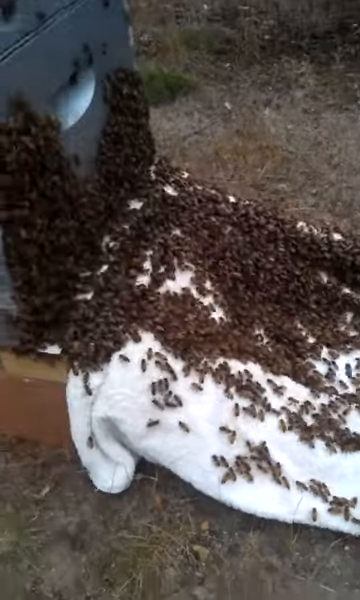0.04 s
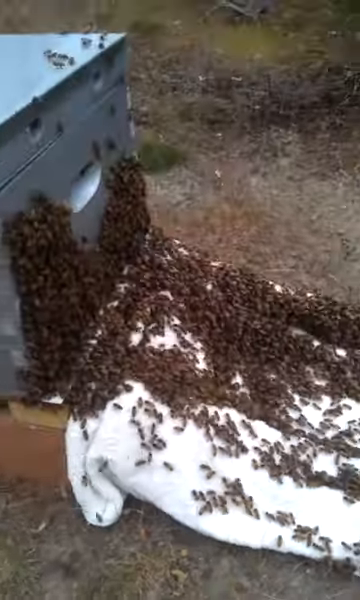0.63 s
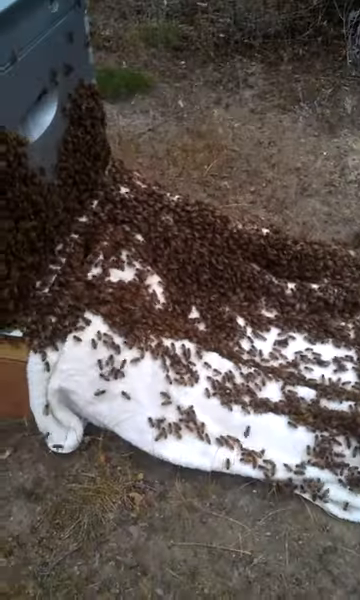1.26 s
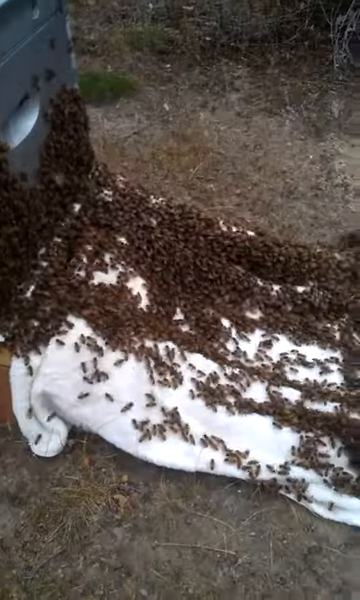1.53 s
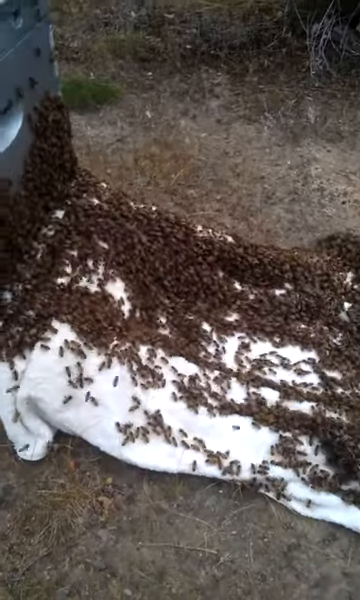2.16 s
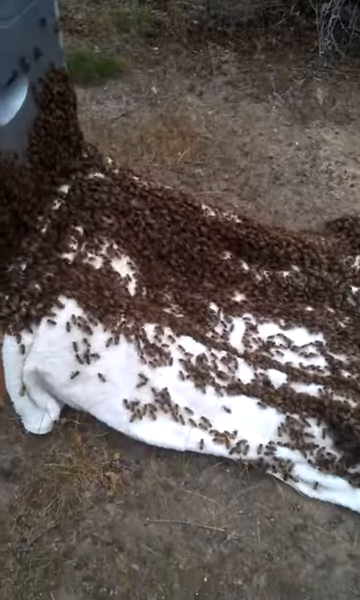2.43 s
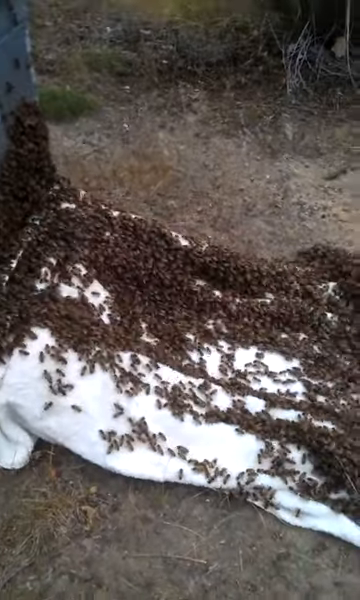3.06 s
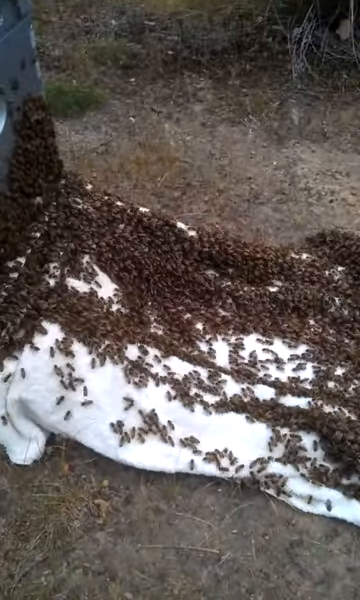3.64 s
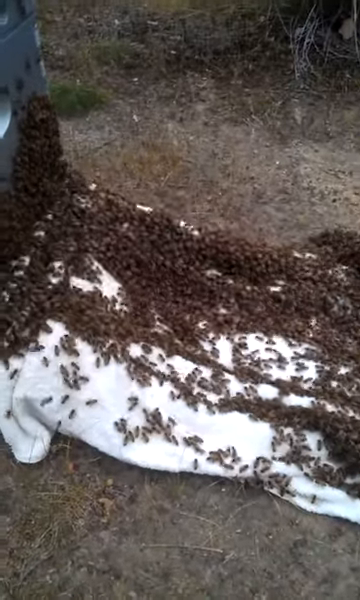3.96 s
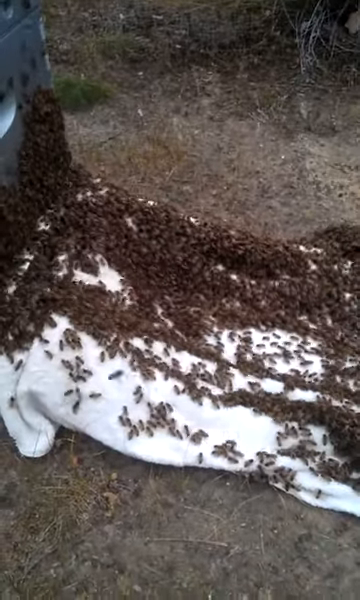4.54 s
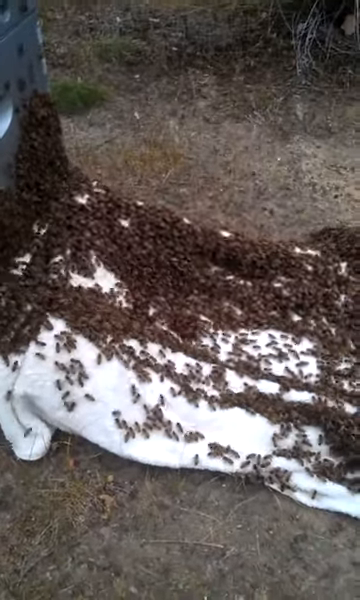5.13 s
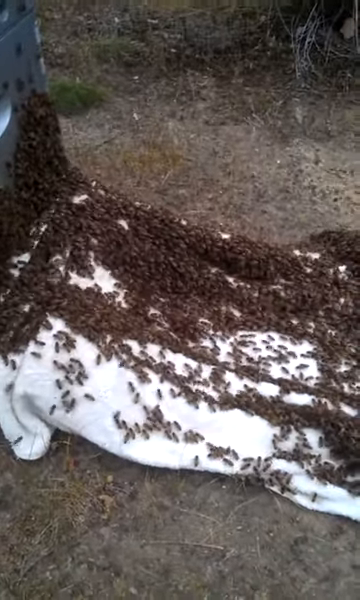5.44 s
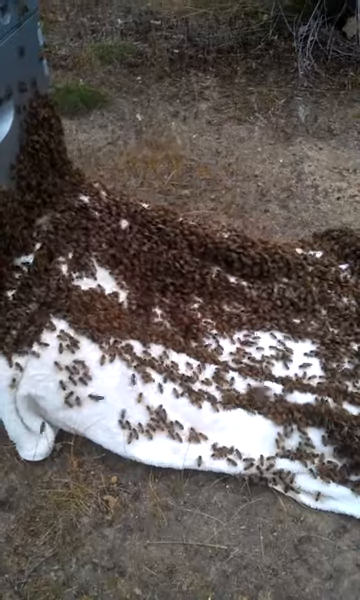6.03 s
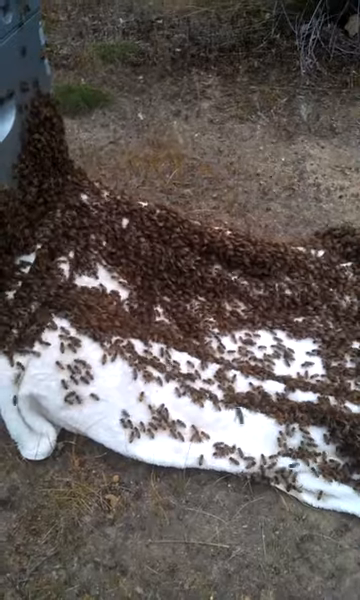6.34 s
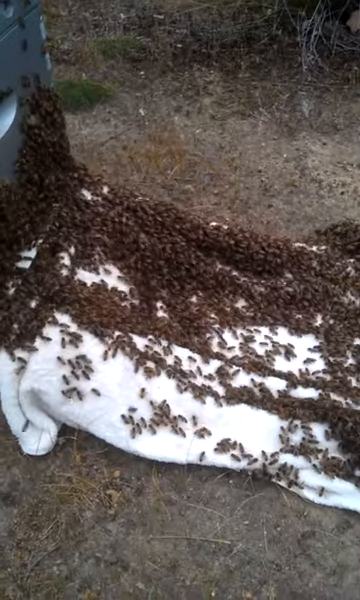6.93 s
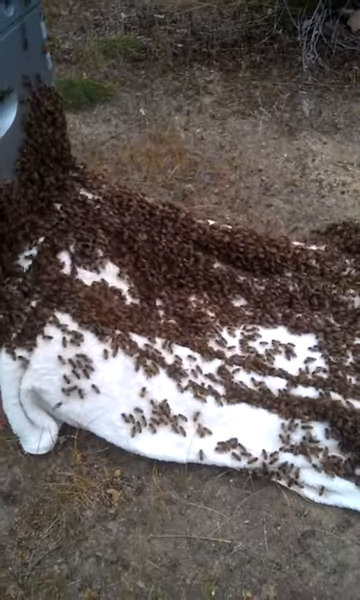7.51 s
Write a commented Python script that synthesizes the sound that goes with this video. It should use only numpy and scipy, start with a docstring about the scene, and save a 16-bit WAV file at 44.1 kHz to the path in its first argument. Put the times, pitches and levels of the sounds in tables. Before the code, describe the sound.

A honeybee swarm hums steadily outdoors, single bees buzzing close, while fingers rub and click on the phone early on.

```python
"""At a hive, outdoors: a honeybee swarm hums over the ground as it moves in; single bees swing close by.
Each bee's wingbeat is a wandering harmonic tone; thousands of feet and wings rustle faintly beneath.
Mostly in the first seconds, fingers slide and rub on a hand-held phone, whose casing clicks and snaps."""
import sys
import numpy as np
from scipy import signal
from scipy.fft import rfft, irfft, next_fast_len
from scipy.io import wavfile

SR = 44100
rng = np.random.default_rng(int(sys.argv[2]) if len(sys.argv) > 2 else 0)


def wav_record(signal):
    """Record a signal, one row per channel, as 16-bit PCM in the file named by sys.argv[1]."""
    frames = np.transpose(np.atleast_2d(signal))
    bounded = np.clip(frames, -1, 1)
    # unit amplitude maps onto the largest positive 16-bit level
    quanta = np.round(bounded * 32767).astype(np.int16)
    wavfile.write(sys.argv[1], SR, quanta)


N = 342657
T = np.arange(N) / SR

# crawling bees and open air: (frequency [Hz], gain [dB])
RUSTLE_SPECTRUM = [(30, -28), (90, -14), (130, -15), (180, 9.5), (370, 14.5), (700, 11.5), (1400, 5.5),
                   (2100, 2.5), (3200, 2), (5000, 1.5), (8500, 0), (10300, -5.5), (16000, -12)]
# light finger slides: (peak time [s], attack [s], release [s], level [dB])
FINGER_SLIDES = [(0.08, .15, 0.46, -48.5), (0.39, 0.033, 0.14, -47), (0.56, .08, 0.25, -45),
                 (0.91, 0.037, 0.12, -43.5), (1.1, .1, .1, -42.5), (1.215, 0.066, 0.22, -45),
                 (1.58, 0.13, 0.048, -43.5), (1.79, 0.021, 0.17, -49), (1.88, 0.017, 0.064, -40),
                 (2.04, 0.039, 0.027, -49), (2.13, 0.055, 0.1, -49.5), (2.93, 0.049, 0.15, -43.5),
                 (3.4, .12, 0.36, -57), (3.66, 0.16, .15, -55.5)]
# hard rubs: (peak time [s], attack [s], release [s], level [dB], relative scrape [dB], resonance [Hz])
FINGER_RUBS = [(0.662, 0.0047, 0.0064, -35.5, 1, 5700), (0.677, 0.015, 0.017, -36, -2.5, 9000),
               (1.078, 0.012, 0.023, -38, -1, 5500), (1.105, 0.014, 0.019, -37, -10, 8000),
               (1.695, 0.016, 0.029, -31.5, -8.5, 8000), (1.906, 0.0073, 0.014, -31, -1, 4530),
               (1.929, 0.016, 0.013, -33.5, 6.5, 1150), (2.565, 0.004, 0.041, -41, 6.5, 5000),
               (2.626, 0.046, 0.02, -24.5, -4, 3100), (2.668, 0.026, 0.069, -36, -23, 5950),
               (2.737, 0.025, 0.018, -38, 2.5, 8500), (2.774, 0.021, 0.015, -25, -14, 4200),
               (2.789, 0.0083, 0.0068, -35, 9, 8500), (2.866, 0.022, 0.012, -30, -4.5, 8500),
               (2.882, 0.0063, 0.013, -37.5, 12, 2000), (3.323, 0.0044, 0.014, -47, 10.5, 2600),
               (3.384, 0.008, 0.014, -55.5, 15, 2600)]
# skin sliding on the casing: (frequency [Hz], gain [dB])
SLIDE_SPECTRUM = [(300, -42), (2200, -15.5), (3700, -2.5), (5500, -1), (7000, -2), (8800, 0), (10500, -10),
                  (12500, -13.5), (16000, -20)]
# rub hiss, also click crack: (frequency [Hz], gain [dB])
RUB_SPECTRUM = [(200, -38), (1200, -4.5), (2600, -1), (4000, 0.5), (7000, 2.5), (9000, 0.5), (11500, -0.5),
                (12400, -8), (16000, -18)]
# skin catching under pressure: (frequency [Hz], gain [dB])
SCRAPE_SPECTRUM = [(40, -50), (110, -29), (220, -6.5), (500, -3), (800, -3), (1150, 0.5), (1600, 0),
                   (2300, -9.5), (5000, -14.5), (16000, -60)]
# dull clicks and knocks: (time [s], level [dB], ring [Hz], half length [ms], relative crack [dB])
GRIP_CLICKS = [(0.556, -43, 6030, 1.1, 8), (0.662, -26, 1400, 0.61, -16), (0.6647, -16, 1050, 0.32, -22),
               (1.681, -31, 915, 0.51, -12), (2.224, -28, 800, 0.89, -10), (2.2542, -5, 2930, 0.15, -23),
               (2.255, -22, 1840, 0.84, -21), (2.368, -43, 3630, 2.2, 4), (2.535, -29, 900, 1.4, -25),
               (2.565, -27.5, 488, 2.3, -23), (2.7857, -15.5, 3920, 0.3, -19), (2.827, -23.5, 800, 0.5, -9),
               (2.8768, -14.5, 2780, 0.27, -8), (2.8835, -17, 427, 0.49, -29), (2.885, -58, 55, 5.8, -22),
               (3.319, -37.5, 2560, 1.2, 0), (7.3412, -27.5, 2750, 0.35, -17)]
# sharp casing slips: (time [s], peak before high-pass [dB], tilt [dB/octave])
CASING_SNAPS = [(0.6513, -23, 3), (0.6533, -23, 5), (0.6584, -14, 2), (0.6608, -12.5, -5),
                (0.6639, -8.5, 9), (1.68, -22, 12), (2.2222, -24, -2), (2.2352, -25, -3), (2.252, -20, 7),
                (2.7858, -12, -7), (2.876, -4, 2), (3.318, -16, 1), (7.341, -23, -8)]
# modes rung by a snap: (frequency [Hz], gain [dB], T60 [ms])
CASING_MODES = [(2700, -35, 1.9), (3800, -4.5, 1.4), (5860, 0.5, 2.4), (7700, -10, 1.4), (9080, 3, 2.5),
                (10850, -2.5, 1.9), (13760, -10, 1.6)]
# close passes, before trim: (time [s], wingbeat [Hz], fundamental [dB], octave [dB], upper buzz [dB])
BEE_PASSES = [(0.007, 249.5, -68, -37.5, -47), (0.125, 250.5, -64, -43, -50), (0.185, 248, -53, -36, -53),
              (0.39, 258.8, -52, -41, -61), (0.493, 255.3, -64, -40, -46), (0.537, 264, -49.5, -59, -53),
              (0.634, 261.3, -64, -43, -55), (0.778, 249.7, -48, -42, -44), (0.939, 254.5, -63, -44, -55),
              (1.131, 249.3, -64, -44.5, -57), (1.212, 254, -58, -38, -40), (1.258, 241.6, -53, -37, -40),
              (1.406, 243, -56, -47, -55), (1.622, 245, -69, -45, -61), (1.763, 264, -44, -54, -53),
              (1.813, 250, -62, -44, -45), (1.871, 237, -49, -42.5, -43), (2.056, 244, -44, -58, -57),
              (2.159, 249, -67, -41.5, -50), (2.339, 255.3, -42.5, -39.5, -49),
              (2.535, 259.3, -41, -52, -47), (2.676, 249.3, -51, -41, -48), (3.163, 269, -43, -48, -52),
              (3.293, 240, -44, -59, -53), (3.378, 238, -59, -48, -40.5), (3.431, 245.6, -56, -47.5, -53),
              (3.593, 244.6, -52, -40.5, -40.5), (3.649, 266, -46, -61, -55), (3.757, 241.4, -47, -56, -46),
              (4.122, 248.6, -57, -46, -52), (4.172, 244, -53, -41.5, -44.5), (4.56, 244, -52, -43.5, -44),
              (4.632, 241.6, -54, -47, -56), (4.835, 253, -48, -48, -52), (4.975, 268, -56, -44.5, -52),
              (5.008, 248, -54, -46.5, -54), (5.347, 260, -48.5, -60, -49), (5.635, 257, -44.5, -61, -55),
              (5.775, 270, -49, -55, -60), (6.116, 250, -50, -46, -51), (6.252, 252, -56, -41, -49),
              (6.295, 262, -62, -57, -44), (6.344, 246.5, -53, -50, -48), (6.484, 245, -55, -44, -42),
              (6.823, 248.8, -52.5, -50, -56), (7.142, 260, -45, -65, -64), (7.232, 255, -63, -45.5, -48)]
# air fanned by wings: (frequency [Hz], gain [dB])
WASH_SPECTRUM = [(60, -39), (120, -15), (200, -1), (380, 3), (700, -38), (3000, -54)]
# one wingbeat: (harmonic number, gain [dB])
WING_HARMONICS = [(1, -14.5), (2, 0.5), (3, 2), (4, 3.5), (5, 4), (6, -0.5), (7, -6.5), (8, -10.5),
                  (11, -13.5), (17, -19)]
# swarm band levels, before trim: (time [s], wingbeat [dB], octave [dB], upper buzz [dB])
HUM_LEVELS = [(0.0, -56, -50, -48.5), (0.15, -58.5, -40, -44), (0.35, -56.5, -48, -47.5),
              (0.9, -56.0, -48, -47.5), (1.25, -55.5, -46.5, -46.5), (1.55, -56.0, -49, -47.5),
              (1.9, -51, -50, -43.5), (2.45, -56, -43.5, -45.0), (2.55, -47.5, -51, -43.5),
              (2.85, -50.5, -47, -41.5), (3.2, -53.0, -51, -45.5), (3.65, -57, -48.5, -43),
              (3.85, -53.5, -51.5, -46), (4.15, -55.5, -48.5, -46), (4.25, -55.5, -52.5, -47),
              (4.6, -54.0, -49.0, -49), (4.8, -55.5, -53, -49.5), (5.45, -58, -51.5, -45.5),
              (5.6, -53, -50, -48.5), (6.1, -56.5, -55.5, -47.5), (6.3, -56, -46.5, -46),
              (6.6, -55, -52.5, -47.5), (7.0, -57.5, -52, -48), (7.76, -56.5, -53.0, -48.5)]


def undb(db):
    """Decibels to gain."""
    return np.exp(np.asarray(db) * (np.log(10) / 20))


def unit(x):
    """Scale to rms 1."""
    return x / np.sqrt(np.mean(x ** 2))


def highpass(x, hz, order=2):
    """Butterworth high-pass."""
    return signal.sosfilt(signal.butter(order, hz, "highpass", fs=SR, output="sos"), x)


def colour(x, spectrum):
    """Apply a (frequency [Hz], gain [dB]) spectrum; rms 1."""
    hz, db = np.transpose(spectrum)
    size = next_fast_len(N)
    log_hz = np.log(np.arange(size // 2 + 1) * SR / size + 1)
    gain = undb(np.interp(log_hz, np.log(hz), db))
    return unit(irfft(rfft(x, size) * gain, size)[:N])


def drift(rate_hz, t=T):
    """Line through random points, rate_hz a second; spread near 1."""
    points = unit(rng.standard_normal(1024))
    return np.interp(t * rate_hz + 2 * rng.random(), np.arange(len(points)), points) * np.sqrt(1.5)


def grains(spread_db):
    """Dense tiny contacts of unequal size."""
    return rng.standard_normal(N) * undb(spread_db * rng.standard_normal(N))


def stroke(peak_s, attack_s, release_s):
    """Finger pressure: Gaussian rise to 1, exponential release."""
    t = T - peak_s
    return np.exp(-np.where(t < 0, (t / attack_s) ** 2, t / release_s).clip(0, 50))


def crawling(level_db=-50):
    """Countless feet and wings rustle on cloth, in the faint hiss of open air."""
    return colour(grains(spread_db=2), RUSTLE_SPECTRUM) * undb(level_db)


def finger_friction(scrape_trim_db=-1, ring_db=1, ring_q=5, catch_db=1.25):
    """Sliding skin hisses; pressed, it catches and scrapes lower. Each grip has its own resonance."""
    slides = [undb(db) * stroke(*timing) for *timing, db in FINGER_SLIDES]
    out = colour(grains(spread_db=2.5), SLIDE_SPECTRUM) * np.linalg.norm(slides, axis=0)
    hiss = colour(grains(spread_db=1.5), RUB_SPECTRUM)
    scrape = colour(grains(spread_db=3), SCRAPE_SPECTRUM)
    for *timing, db, scrape_db, ring_hz in FINGER_RUBS:
        pressure = stroke(*timing)
        ring = signal.lfilter(*signal.iirpeak(ring_hz, ring_q, fs=SR), hiss)
        high = unit(hiss + undb(ring_db) * ring) * pressure
        low = scrape * undb(scrape_db + scrape_trim_db) * pressure ** 1.15
        out += undb(db) * (high + low)
    return highpass(out * undb(catch_db * drift(250)), hz=130)


def grip_clicks(rise_ratio=0.75, scuff_db=-51, scuff_s=0.058):
    """The grip shifts: a crack and a brief ring, then a faint scuff as the skin settles."""
    out = np.zeros(N)
    hiss = colour(rng.standard_normal(N), RUB_SPECTRUM)
    for time_s, db, ring_hz, half_ms, crack_db in GRIP_CLICKS:
        span = slice(int(time_s * SR) - 512, int(time_s * SR) + 2048)
        t = T[span] - time_s
        progress = np.clip(1000 * t / half_ms, -50, 50)
        swell = 2 / (np.exp(progress) + np.exp(-progress / rise_ratio))
        # a small stiff part radiates little below its ring
        ring = highpass(swell * np.sin(2 * np.pi * ring_hz * t), 0.47 * ring_hz, order=4)
        crack = undb(db + crack_db) * swell
        scuff = (t > 0) * undb(scuff_db) * np.exp(-t / scuff_s)
        out[span] += undb(db) * ring + highpass((crack + scuff) * hiss[span], hz=150)
    return out


def casing_snaps(rise_ms=0.064, top_mode_travel_ms=0.43):
    """Stick-slip: the casing lets go and rings all its modes; high ones arrive first."""
    out, t = np.zeros(N), T[:512]
    hz, mode_db, t60_ms = np.transpose(CASING_MODES)
    lag_ms = top_mode_travel_ms * (np.sqrt(hz[-1] / hz) - 1)
    age_ms = np.maximum(1000 * t[:, None] - lag_ms, 0)
    envelopes = np.exp(-np.log(1000) * age_ms / t60_ms) * (1 - np.exp(-age_ms / rise_ms))
    rings = np.sin(2 * np.pi * hz * age_ms / 1000) * envelopes
    for time_s, peak_db, tilt_db in CASING_SNAPS:
        snap = rings @ undb(mode_db + tilt_db * np.log2(hz / hz[0]))
        start = int(time_s * SR)
        out[start:start + len(t)] += undb(peak_db) * snap / np.abs(snap).max()
    return highpass(out, hz=1200)


def near_bees(half_pass_s=0.015, doppler=0.019, flutter=0.029, tremble_db=1, wash_db=-11):
    """A passing bee swells, flutters and drops in pitch; its wings fan a soft puff of air."""
    out = np.zeros(N)
    wash = undb(wash_db) * colour(rng.standard_normal(N), WASH_SPECTRUM)
    waver = flutter * drift(70)
    for time_s, beat_hz, beat_db, octave_db, buzz_db in BEE_PASSES:
        span = slice(max(int((time_s - 4 * half_pass_s) * SR), 0), int((time_s + 4 * half_pass_s) * SR))
        progress = (T[span] - time_s) / half_pass_s
        hz = beat_hz * (1 - doppler * np.tanh(progress) + waver[span])
        phase = 2 * np.pi * (np.cumsum(hz) / SR + rng.random())
        tone = undb(beat_db) * (np.sin(phase) + wash[span]) + undb(octave_db) * np.sin(2 * phase)
        for harmonic, trim_db in enumerate((-5, -7, -9, -11), start=3):
            tone += undb(buzz_db + trim_db) * np.sin(harmonic * phase + 2 * np.pi * rng.random())
        out[span] += np.sqrt(2) * tone / np.cosh(progress) ** 2
    return out * undb(tremble_db * drift(60))


def wingbeats(bees=48, beat_hz=253, spread=0.067, wander=0.045, flutter=0.047, distance_db=5):
    """Each bee's wingbeat wavers as it steers, and swells and fades with distance."""
    t = T[::4]  # quarter rate
    cycle, harmonics = np.arange(2048) / 2048, np.arange(1, 18)
    gains = undb(np.interp(harmonics, *np.transpose(WING_HARMONICS)))
    rank = (np.arange(bees) + 0.5) / bees
    detunes = unit(np.log(rank / (1 - rank)))  # most near the common rate, a few far off
    out = np.zeros(len(t))
    for detune in detunes:
        wave = gains @ np.sin(2 * np.pi * (np.outer(harmonics, cycle) + rng.random((len(gains), 1))))
        hz = beat_hz * np.exp(spread * detune + wander * drift(5, t) + flutter * drift(40, t))
        turns = np.cumsum(hz) * t[1] + rng.random()
        nearness = unit(undb(distance_db * np.minimum(drift(16, t), 2)))
        out += nearness * wave[(turns * len(cycle)).astype(int) % len(cycle)]
    return signal.resample_poly(out, 4, 1)[:N]


def swarm(splits_hz=(350, 620), shimmer_db=1.62, throb_db=1.83):
    """Wings throw beat, octave and upper buzz in different directions, so the bands swell apart."""
    hum = wingbeats()
    beat, low = (signal.sosfiltfilt(signal.butter(6, hz, fs=SR, output="sos"), hum) for hz in splits_hz)
    time_s, beat_db, octave_db, buzz_db = np.transpose(HUM_LEVELS)

    def swell(band, level_db, trim_db, depth_db):
        return unit(band) * undb(np.interp(T, time_s, level_db) + trim_db + depth_db * drift(50))

    return (swell(hum - low, buzz_db, trim_db=-0.83, depth_db=shimmer_db)
            + swell(low - beat, octave_db, trim_db=-2, depth_db=throb_db)
            + swell(beat, beat_db, trim_db=-1.5, depth_db=throb_db))


def scene():
    """Bees and handling noise, mono."""
    return (swarm() + near_bees() + crawling() + finger_friction() + grip_clicks() + casing_snaps())[None]


def record(dry):
    """The phone cuts the treble above 15.9 kHz."""
    return signal.sosfilt(signal.ellip(10, 0.2, 80, 15900, fs=SR, output="sos"), dry)


dry = scene()
out = record(dry)
wav_record(out)
```